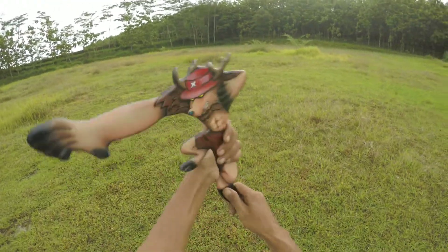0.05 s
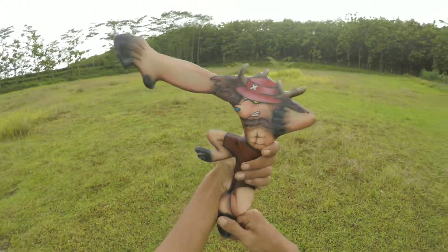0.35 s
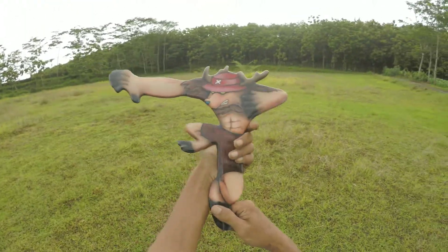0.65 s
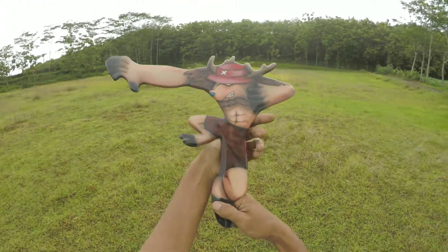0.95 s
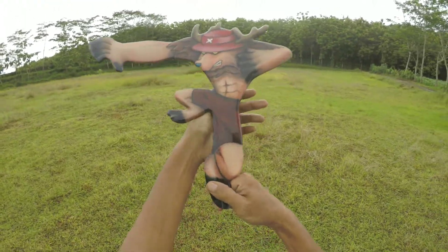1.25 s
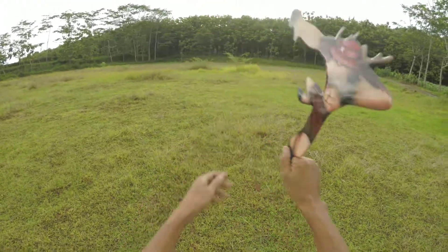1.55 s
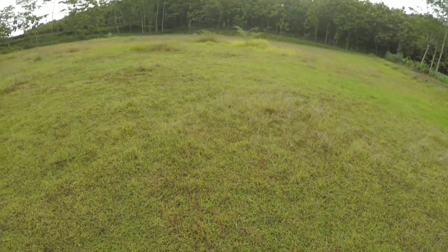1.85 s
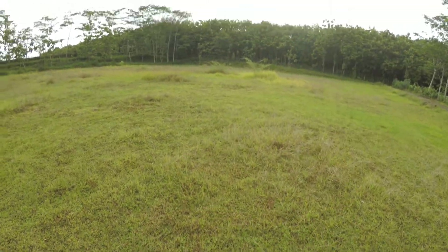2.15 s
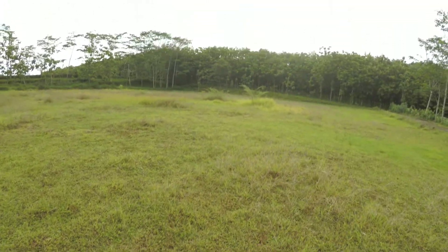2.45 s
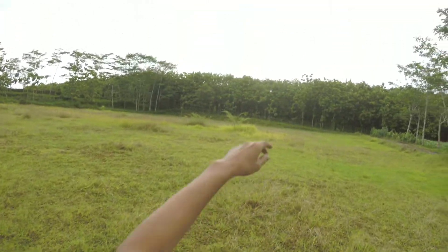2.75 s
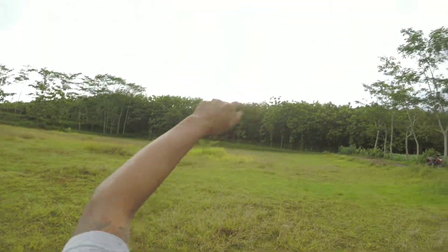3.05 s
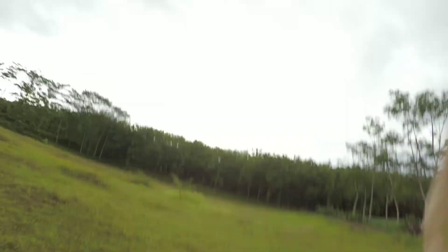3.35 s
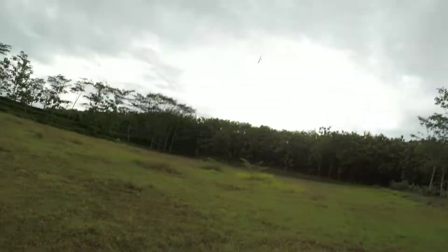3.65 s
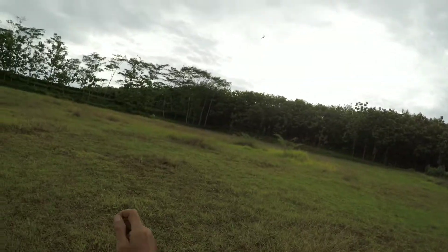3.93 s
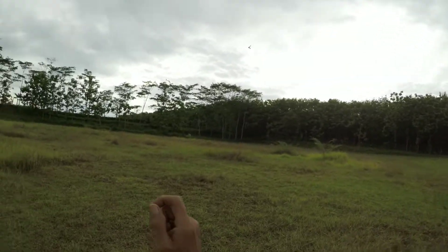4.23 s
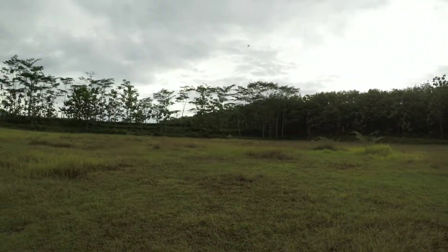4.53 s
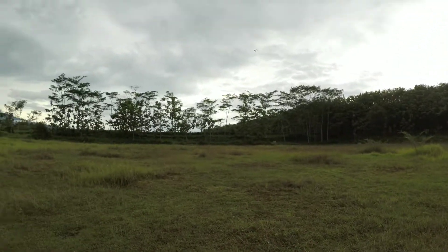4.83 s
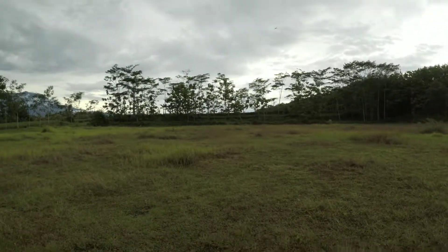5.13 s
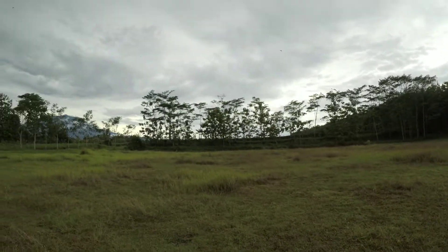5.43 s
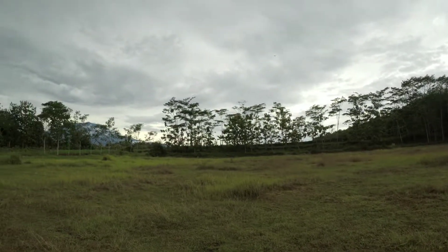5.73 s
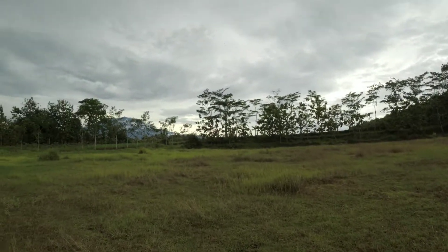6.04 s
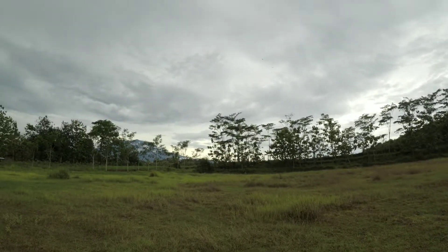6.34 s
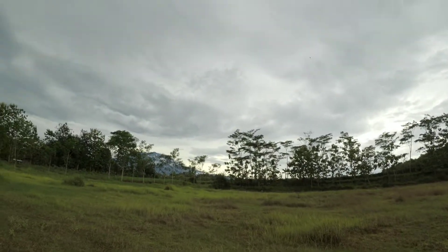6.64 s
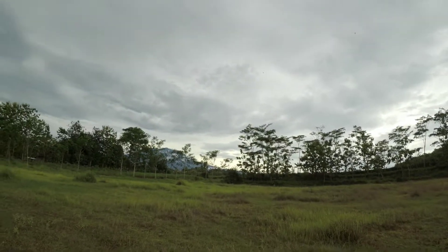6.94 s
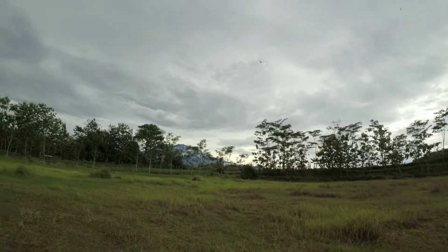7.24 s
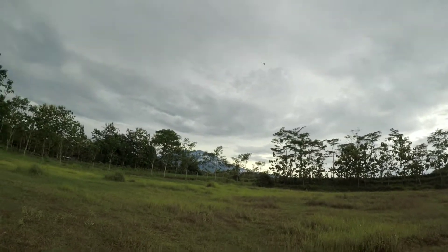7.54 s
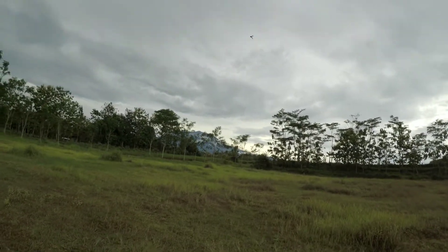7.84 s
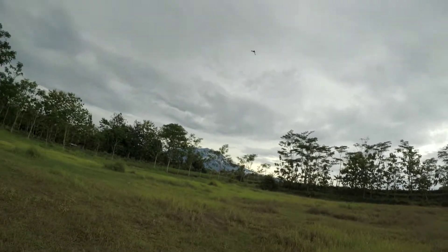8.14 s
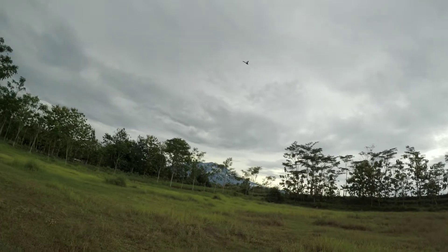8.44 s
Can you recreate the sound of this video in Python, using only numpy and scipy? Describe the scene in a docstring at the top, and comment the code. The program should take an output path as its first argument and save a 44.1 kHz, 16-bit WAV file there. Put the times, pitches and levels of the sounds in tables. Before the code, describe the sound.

A head-worn camera's mount clicks, rubs and creaks over light gusts on the microphone and thin cricket chirping in a meadow.

```python
"""Light wind rumbles over the hush of a meadow where bush-crickets sing by rubbing their wings.
The listener is a head-worn camera whose two microphone ports are buffeted by turbulent eddies.
As the head turns, the strap rubs and the plastic mount clicks, knocks and creaks in damped modes
that rock the two ports in opposite senses. The camera's limiter ducks after the hardest blows."""
import sys
import numpy as np
from scipy.fft import rfft, irfft, next_fast_len
from scipy.io import wavfile
from scipy.ndimage import uniform_filter1d, minimum_filter1d, map_coordinates

SR = 44100
rng = np.random.default_rng(int(sys.argv[2]) if len(sys.argv) > 2 else 0)


def wav_record(signal):
    """Record a signal, one row per channel, as 16-bit PCM in the file named by sys.argv[1]."""
    frames = np.transpose(np.atleast_2d(signal))
    bounded = np.clip(frames, -1, 1)
    # unit amplitude maps onto the largest positive 16-bit level
    quanta = np.round(bounded * 32767).astype(np.int16)
    wavfile.write(sys.argv[1], SR, quanta)


N = 382788

# coherence of airborne sound at the two ports: (frequency [Hz], correlation [-1 to 1])
AIR_COHERENCE = [(200, 0.094), (550, -0.45), (1100, -0.43), (2400, 0.061), (3900, 0.45), (6200, -0.3),
                 (10000, -0.25)]
# pressure of slow eddies on the ports: (frequency [Hz], spectral level [dB])
BUFFET_SPECTRUM = [(8, -7.5), (22, 2.5), (35, -2), (60, -7.5), (100, -28.5), (200, -37), (500, -94)]


def amp(db):
    """Decibels to amplitude ratio."""
    return np.exp(np.asarray(db) * np.log(10) / 20)


def unit(x):
    """Normalisation to rms 1."""
    return x / np.sqrt(np.mean(x ** 2) + 1e-20)


def clock():
    """The time of each sample [s]."""
    return np.arange(N) / SR


def curves(rows):
    """Linear interpolation in time: one value per sample for each column after the first."""
    times, *columns = np.transpose(rows)
    return [np.interp(clock(), times, column) for column in columns]


def along(points, hz):
    """Interpolation of (frequency [Hz], value) points on a log axis; a plain number holds everywhere."""
    freqs, values = np.transpose(points) if np.ndim(points) else ([1], [points])
    return np.interp(np.log(hz + 1), np.log(freqs), values)


def wobble(rate):
    """Random modulation: a smooth curve through `rate` Gaussian knots a second."""
    steps = np.arange(0, N * rate / SR + 1, 1 / 4)
    knots = rng.standard_normal(len(steps) // 4 + 3)
    return np.interp(clock() * rate, steps, map_coordinates(knots, [steps]))


def swells(rows):
    """Summed Gaussian envelopes from rows of (peak time [s], half length [s], level [dB])."""
    t = clock()[::32]
    bells = (amp(db) * np.exp(-np.minimum(((t - s) / half) ** 2, 20)) for s, half, db in rows)
    return np.interp(clock(), t, sum(bells))


def panned(right_db):
    """Left and right gains for a level difference between the ports."""
    return amp(np.array([[-.5], [.5]]) * right_db)


def add(track, s, sound):
    """Superposition of a short sound on the track at time s."""
    part = track[:, round(s * SR):][:, :sound.shape[-1]]
    part += sound[..., :part.shape[1]]


def filtered(x, response):
    """Linear filtering: the spectrum of x times a frequency response."""
    size = next_fast_len(N + SR // 2)
    return irfft(rfft(x, size) * response(np.fft.rfftfreq(size, 1 / SR)), size)[..., :N]


def noise(gain):
    """Two uncorrelated Gaussian noises coloured by a gain of frequency."""
    size = next_fast_len(N, real=True)
    bins = rng.standard_normal((2, 2 * (size // 2 + 1)), dtype=np.float32).view(np.complex64)
    return irfft(bins * gain(np.fft.rfftfreq(size, 1 / SR)).astype(np.float32), size)[:, :N]


def rush(spectrum, coherence):
    """Partly coherent stereo noise of rms 1; coherence runs from -1 (antiphase) to 1 (in phase)."""
    def mid_side_gains(hz):
        angle = np.arccos(np.clip(along(coherence, hz), -1, 1)) / 2
        return amp(along(spectrum, hz)) * [np.cos(angle), np.sin(angle)]
    mid, side = noise(mid_side_gains)
    return unit(np.array([mid + side, mid - side]))


def ring(modes, port_phase, attack_s, scatter_db, sign=1):
    """Damped modes (Hz, dB, T60 s), lagging port_phase [rad] on the right; sign -1 opposes neighbours."""
    t = np.arange(SR // 16) / SR
    lags = np.broadcast_to(port_phase, len(modes))
    sound = np.zeros((2, len(t)))
    for k, (hz, db, t60) in enumerate(modes):
        decay = amp(db + rng.normal(0, scatter_db) - 60 * t / t60)
        sound += sign ** k * decay * np.sin(2 * np.pi * hz * t - np.array([[0], [lags[k]]]))
    return sound * (1 - np.exp(-t / attack_s))


def breeze():
    """Turbulent pressure: slow eddies buffet the ports; smaller ones flutter and die in the lulls."""
    # wind between gusts: (time [s], relative buffet level [dB], relative flutter level [dB])
    strength = [(0, -37, -34.5), (0.55, -43, -39.5), (1.14, -52.5, -46.5), (2.1, -53.5, -50),
                (2.5, -40.5, -42.5), (3.1, -40, -35.5), (3.7, -35, -42), (4.2, -41, -41), (5.0, -36, -31),
                (5.5, -36, -35), (6.3, -36, -34), (7.1, -38.5, -33.5), (7.8, -30.5, -33.5), (8.4, -36, -39),
                (8.68, -28, -30)]
    # small eddies: (frequency [Hz], spectral level [dB])
    flutter_spectrum = [(35, -10), (70, 4.5), (120, -0.5), (180, -9.5), (280, -28.5), (600, -46.5),
                        (2000, -61)]
    buffet_db, flutter_db = curves(strength)
    buffet_gain = amp(buffet_db + 7 + 1.6 * wobble(11)) * panned(right_db=0.5)
    buffet = buffet_gain * rush(BUFFET_SPECTRUM, coherence=0.52)
    lull_gate = amp(flutter_db) / np.hypot(amp(flutter_db), amp(-41))
    flutter_gain = lull_gate * amp(flutter_db + 1.3 + 2.16 * wobble(20)) * panned(right_db=-3.5)
    return buffet + flutter_gain * rush(flutter_spectrum, coherence=0.86)


def far_trees():
    """Broadband noise: the hush of distant trees, slowly modulated in level."""
    # the hush: (frequency [Hz], spectral level [dB])
    spectrum = [(120, -13), (300, 3), (600, -1), (1100, -2), (1800, -9.5), (2600, -11), (4200, -17),
                (6200, -13.5), (8000, -12.5), (10500, -14), (11300, -26.5), (14500, -28.5), (15500, -49)]
    return amp(-49 + 0.73 * wobble(4.11)) * rush(spectrum, AIR_COHERENCE)


def distant_drone():
    """A low band of noise with faint tones that waver in amplitude and frequency."""
    # the noise band: (frequency [Hz], spectral level [dB])
    spectrum = [(40, -7), (95, -19.5), (135, 0.5), (185, -1.5), (230, -7), (270, -11), (340, -16),
                (600, -24.5), (1500, -54)]
    # its tones: (frequency [Hz], level [dB])
    tones = [(134, -47.5), (186, -51.5), (264, -55)]
    drone = amp(-43.5 + wobble(2.77)) * rush(spectrum, coherence=0.77)
    for hz, db in tones:
        gain = amp(db + 2.35 * wobble(5))
        drone += gain * np.sin(2 * np.pi * np.cumsum(hz + 1.6 * wobble(5)) / SR)
    return drone


def stridulation(pitch_hz, width_hz, stroke_hz, sharpness, scatter, fall_hz, port_phase):
    """Stridulation: each wing stroke is a tone pulse falling in pitch, partly scattered by the grass."""
    stroke = np.cumsum(stroke_hz) / SR % 1 - .5
    phase = 2 * np.pi * np.cumsum(pitch_hz - fall_hz * stroke + wobble(700) * width_hz / 2) / SR
    carrier = np.cos([phase, phase - port_phase])
    pulses = np.exp(sharpness * np.cos(2 * np.pi * stroke))
    scattered = unit(noise(lambda hz: 1 / (1 + (hz / width_hz) ** 3)))
    return unit(carrier * (pulses + scatter * scattered))


def steady_chirps(attack_s, swell_db, rest_db):
    """Periodic gating: each chirp grows, then sinks into a rest that the meadow's echo half fills."""
    onset_s, period_s, length_s, release_s = 4.510, .1055, .09, .008
    age = (clock() - onset_s) % period_s
    gate = np.clip(np.minimum(age / attack_s, (length_s - age) / release_s), amp(rest_db), 1)
    return unit(gate * amp(swell_db * age / length_s + 0.8 * wobble(15)))


def unsteady_chirps(rate_hz, pause_db):
    """Amplitude modulation: chirps parted by short dips, at a slightly drifting pace."""
    cycles = np.cumsum(rate_hz * (1 + 0.035 * wobble(3.03))) / SR
    return unit(amp(-pause_db * np.sin(np.pi * cycles) ** 8))


def crickets():
    """Two bush-crickets stridulate in chirps, in front of a distant chorus."""
    # the near and the higher cricket: (time [s], level [dB], right over left [dB], pitch [Hz])
    near_song = [(0, -75, 5, 9030), (2.1, -67, 12, 9030), (2.6, -60, 14, 8980), (3.3, -56.5, 18, 8910),
                 (3.55, -57.5, 14, 9050), (3.9, -55, 19, 9090), (4.7, -53.5, 16, 9080),
                 (5.2, -57, 17, 8990), (5.8, -58, 13, 8980), (6.6, -61, 16.5, 8980), (8.68, -67, 6, 9150)]
    high_song = [(0, -63, -5, 9940), (2.1, -60, -1, 9830), (2.6, -72, 8, 9650), (4.2, -61.5, 14, 9610),
                 (5.4, -59, 16, 9650), (6.3, -62, 14, 9730), (7.5, -57.5, 12, 9680),
                 (8.68, -60.5, 12, 9680)]
    # the chorus and a thin hiss: (frequency [Hz], spectral level [dB])
    chorus_spectrum = [(6800, -41), (7250, -6), (7500, -4), (7850, -15), (8300, -22), (8900, -4), (9400, 3),
                       (10000, -7.5), (10600, -8.5), (11100, -34)]
    hiss_spectrum = [(13000, -30), (14000, -3), (14600, 0), (15100, -25)]
    near_db, near_right_db, near_hz = curves(near_song)
    high_db, high_right_db, high_hz = curves(high_song)
    near = stridulation(near_hz, width_hz=165, stroke_hz=135 + 1.5 * wobble(7.2),
                        sharpness=0.77, scatter=0.38, fall_hz=810, port_phase=2.65)
    near *= amp(near_db) * panned(near_right_db) * steady_chirps(0.011, swell_db=3.5, rest_db=-10)
    high = stridulation(high_hz, width_hz=241, stroke_hz=130 + 5 * wobble(5),
                        sharpness=0.44, scatter=0.6, fall_hz=790, port_phase=2.3)
    high *= amp(high_db) * panned(high_right_db) * unsteady_chirps(rate_hz=8.1, pause_db=5)
    chorus = amp(-59 + 0.42 * wobble(14)) * panned(8.5) * rush(chorus_spectrum, coherence=-0.24)
    # a faint, thin hiss near 14.5 kHz follows the higher cricket's level
    hiss = amp(high_db - 16 + 1.5 * wobble(16)) * panned(4) * rush(hiss_spectrum, coherence=0.1)
    return near + high + chorus + hiss


def buzzing_insect():
    """Stridulation in bursts: each swells to a wavering hold while the wing strokes slow, then stops."""
    # a third insect: (start [s], end [s], level [dB], right over left [dB], port phase [rad])
    buzzes = [(0.05, 0.624, -53, -5.5, 2.4), (1.08, 1.62, -59, 0, -3), (1.63, 1.78, -54, -1, -2.2),
              (2.34, 2.92, -53.5, -3.5, -1.6), (3.68, 4.178, -50, -2, 3), (4.72, 5.29, -48.5, 8, 2.5),
              (5.795, 6.422, -53.5, 3.5, 2.9), (6.9, 7.52, -57, 3, -2.8), (8.1, 8.632, -54.5, 1, -1.6)]
    level, stroke_hz, phase = np.zeros((2, N)), np.full((1, N), 190.), np.zeros((1, N))
    for start, end, db, right_db, port_phase in buzzes:
        progress = np.linspace(0, 1, round((end - start) * SR))
        envelope = np.tanh(2.4 * progress) * np.minimum((1 - progress) / 0.065, 1)
        add(level, start, amp(db) * panned(right_db) * envelope)
        add(stroke_hz, start, -28 * progress ** 2)
        add(phase, start, np.full(len(progress), port_phase))
    level *= amp(0.9 * wobble(14))
    return level * stridulation(7650, width_hz=170, stroke_hz=stroke_hz[0],
                                sharpness=0.75, scatter=0.43, fall_hz=400, port_phase=phase[0])


def strap_rubbing():
    """Sliding friction: the strap chafes restlessly on the mount, steadier in its firm strokes."""
    # light contact, firmer once the head starts to turn: (time [s], relative level [dB])
    contact = [(0, -56), (2.1, -58.5), (2.8, -48.5), (3.9, -52), (4.6, -47), (8.1, -47), (8.35, -60)]
    # firm strokes: (peak time [s], half length [s], relative level [dB])
    strokes = [(2.58, 0.054, -42), (2.9, 0.059, -41.5), (3.0, 0.022, -41), (3.08, 0.022, -38),
               (3.19, 0.028, -35.5), (3.28, 0.06, -34), (3.38, 0.022, -33), (3.407, 0.014, -20.5),
               (3.472, 0.026, -28), (3.51, 0.051, -33), (3.668, 0.02, -33), (3.75, 0.04, -42.5),
               (4.35, 0.17, -47), (5.07, .02, -37), (5.17, 0.028, -36), (5.32, .05, -37.5),
               (5.94, 0.094, -39.5), (6.21, 0.052, -38.5), (6.43, .02, -37.5), (6.67, 0.072, -36),
               (7.35, 0.14, -37.5), (7.665, 0.033, -35.5), (7.85, 0.14, -40.5), (8.12, 0.02, -32.5),
               (8.24, 0.035, -39.5), (8.66, 0.017, -26)]
    # the strap and the rubbed shell: (frequency [Hz], spectral level [dB])
    strap_spectrum = [(50, -21), (120, -5), (250, 0.5), (400, -2), (560, -9.5), (720, -17), (850, -12),
                      (1050, -15.5), (1400, -19), (1900, -29), (2700, -32), (4000, -70)]
    shell_spectrum = [(200, 3.5), (350, 0.5), (550, 0.5), (750, -29), (1100, -8), (1470, -5.5),
                      (1700, -10.5), (1950, -13), (2300, -14.5), (2700, -17.5), (3500, -20.5), (8000, -40),
                      (12000, -65)]
    contact_db, = curves(contact)
    chafe = amp(contact_db + 3.9 * wobble(13) + 3.2 * wobble(70))
    drag = np.hypot(chafe, swells(strokes) * amp(1 + 2.1 * wobble(140)))
    strap = amp(3) * rush(strap_spectrum, coherence=-0.95)
    shell = amp(-9.5) * rush(shell_spectrum, coherence=0.66)
    return drag * (strap + shell)


def bird():
    """Frequency modulation: a far bird's thin peeps glide, blurred by a fast waver in pitch."""
    # calls: (start [s], length [s], first pitch [Hz], last pitch [Hz], relative level [dB])
    peeps = [(1.013, .09, 5180, 5250, -64), (1.042, .03, 5100, 3900, -65), (1.087, .025, 5240, 4000, -63)]
    track = np.zeros((2, N))
    waver_hz = 90 * wobble(533)
    for s, length, first_hz, last_hz, db in peeps:
        hz = np.linspace(first_hz, last_hz, round(length * SR))
        phase = 2 * np.pi * np.cumsum(hz + waver_hz[:len(hz)]) / SR
        add(track, s, amp(db + 3) * np.hanning(len(hz)) * np.sin(phase))
    return track


def brushing():
    """Friction noise: clothes and grass brush in grainy swells that arrive through the air."""
    # brushes: (peak time [s], half length [s], relative level [dB])
    strokes = [(1.8, 0.17, -56), (2.56, 0.12, -52), (2.77, .05, -59), (2.9, 0.064, -56), (3.07, 0.028, -58),
               (3.232, 0.068, -47.5), (3.336, 0.008, -49), (3.395, 0.042, -44), (3.53, 0.079, -49),
               (3.73, 0.026, -56), (4.377, 0.13, -58), (5.04, 0.04, -49), (5.132, 0.022, -50),
               (5.803, 0.051, -50.5), (6.577, 0.043, -47), (7.29, 0.038, -47), (7.995, .012, -47),
               (8.523, 0.026, -44.5), (8.63, 0.034, -43.5)]
    # rubbed cloth: (frequency [Hz], spectral level [dB])
    spectrum = [(300, -1), (1400, 6.5), (2600, 3.5), (3600, 0.5), (5000, -2.5), (7000, 3.5), (9000, 1.5),
                (12000, -31), (15000, -40)]
    grain = amp(0.5 + 2.95 * wobble(150) + 2.2 * wobble(900))
    return swells(strokes) * grain * rush(spectrum, AIR_COHERENCE)


def thump(port_phase):
    """Free vibration: the whole camera shudders in its low modes after a blow."""
    # the camera's modes: (frequency [Hz], level [dB], T60 [s])
    modes = [(115, -1, 0.028), (181, 0.5, 0.026), (273, -3.5, 0.023), (390, -6, 0.017)]
    return ring(modes, port_phase, attack_s=0.0024, scatter_db=2.5)


def clicks():
    """Impulse response: a sharp blow rings two opposed modes, with a tick, a dull push and a thump."""
    # clicks of the mount: (time [s], level [dB], ring [Hz], T60 [s], second ring [Hz], its level [dB],
    # tick [dB], push [dB], push [Hz], thump [dB], port phase [rad]); parts are relative to the level
    blows = [(1.897, -27.5, 1930, 0.0069, 2600, -10, -18, -6, 550, -1, -1.8),
             (2.1694, 8, 2430, 0.0082, 1300, -20, -11.5, -18, 700, -12, -2),
             (5.7463, -8, 1950, 0.0074, 3300, -6.5, -13, -5, 330, -7.5, -1.34),
             (6.129, -5.5, 1460, 0.0072, 1860, -1.5, -22, 4, 557, -7, -2.0)]
    # the tick's treble modes: (frequency [Hz], level [dB], T60 [s])
    tick_modes = [(2630, 10, 0.0061), (3220, 7.5, 0.0029), (5840, 2, 0.0042), (7280, 5.5, 0.0049),
                  (8500, -0.5, 0.0048), (10600, -14, 0.005)]
    push_t60_s = 0.0038
    track = np.zeros((2, N))
    for s, db, hz, t60, second_hz, second_db, tick_db, push_db, push_hz, thump_db, phase in blows:
        modes = [(hz, 0, t60), (second_hz, second_db, t60)]
        body = ring(modes, phase, attack_s=0.00037, scatter_db=1, sign=-1)
        tick = amp(tick_db) * ring(tick_modes, phase, attack_s=0.00011, scatter_db=0.5)
        push = amp(push_db) * ring([(push_hz, 0, push_t60_s)], phase, attack_s=0.0003, scatter_db=0.5)
        add(track, s, amp(db) * (body + tick - push + amp(thump_db) * thump(phase)))
    return track


def knocks():
    """Impact and recoil: a dull blow rings the case, then the camera shudders, rocks and settles."""
    # knocks of the mount:
    # (time [s], relative ring level [dB], thump [dB], rocking [dB], rocking [Hz], port phase [rad])
    blows = [(2.573, -21, -38, -34, 300, -1.6), (3.271, -36, -14, -20, 280, -1.2),
             (3.281, -33, -13.5, -22, 300, -1.3), (3.293, -31, -17, -15, 310, -1.5),
             (3.363, -19.5, -15, -11, 320, -1.5), (3.393, -14, -14, -11, 350, -2.5),
             (3.4165, -12, -3, 2, 357, -2), (3.535, -29, -17, -16, 300, 0),
             (3.672, -11, -13, -12, 290, -2.5), (4.063, -11.5, -22, -21, 400, -2.5),
             (6.729, -16.5, -17, -16, 302, -2), (7.6478, -6, -11, -2, 278, -2.5),
             (7.681, -33, -18, -16, 290, -2.4), (8.1153, -3.5, -7, -1, 280, -2.5),
             (8.214, -22, -14, -17, 280, 2.5), (8.24, -32, -14, -15, 280, 3),
             (8.657, -4, -8.5, -2.5, 280, -2.6)]
    # modes of the case and its catch: (frequency [Hz], level [dB], T60 [s])
    case_modes = [(485, -9.5, 0.034), (870, -7, 0.0068), (1364, -2, 0.018), (1474, -4.5, 0.019),
                  (1890, -7.5, 0.014), (2630, -17, 0.01)]
    recoil_s, rock_t60_s = 0.00218, 0.019
    track = np.zeros((2, N))
    for s, db, thump_db, rock_db, rock_hz, phase in blows:
        rock = ring([(rock_hz, 0, rock_t60_s)], port_phase=-2.46, attack_s=0.0013, scatter_db=1)
        add(track, s, amp(db - 4) * ring(case_modes, phase, attack_s=0.0016, scatter_db=1.5))
        add(track, s + recoil_s, amp(thump_db) * thump(phase) + amp(rock_db) * rock)
    return track


def gusts():
    """Vortex shedding: each gust buffets the ports separately and sheds quicker eddies off the camera."""
    # gusts from the wind or a swing of the head:
    # (peak time [s], half length [s], relative buffet level [dB], relative eddy level [dB])
    puffs = [(3.229, 0.067, -20, -26.5), (3.424, 0.08, -17.5, -27.5), (3.551, 0.013, -13, -19),
             (3.773, 0.093, -31, -42.5), (4.388, 0.094, -27, -37), (4.75, 0.047, -31.5, -35),
             (5.067, 0.057, -23.5, -22.5), (5.186, 0.07, -27.5, -23), (5.424, 0.053, -30, -34),
             (5.872, 0.1, -23.5, -37), (6.24, 0.045, -33, -32.5), (6.652, 0.099, -20.5, -34),
             (6.883, 0.038, -31, -29), (7.305, 0.04, -22, -38), (7.455, 0.03, -26, -40),
             (7.64, 0.05, -21, -25.5), (8.03, 0.078, -19.5, -32.5), (8.245, 0.017, -17.5, -27.5),
             (8.679, 0.057, -14, -28)]
    # shed eddies: (frequency [Hz], spectral level [dB])
    eddy_spectrum = [(35, -9), (70, 1), (110, -2.5), (165, -10.5), (250, -28), (600, -44), (2000, -82)]
    buffet_gain = swells([(s, half, db) for s, half, db, _ in puffs]) * amp(5 + 1.6 * wobble(10))
    eddy_gain = swells([(s, half, db) for s, half, _, db in puffs]) * amp(1 + 3.5 * wobble(20))
    buffet = buffet_gain * panned(right_db=4) * rush(BUFFET_SPECTRUM, coherence=0.078)
    return buffet + eddy_gain * rush(eddy_spectrum, coherence=0.24)


def scraping():
    """Forced resonance: the strap's edge slides with even pressure and keeps the shell ringing."""
    # scrapes, often just before a knock: (start [s], end [s], level [dB])
    scrapes = [(3.386, 3.428, -26.5), (3.443, 3.545, -34.5), (3.533, 3.576, -49), (3.643, 3.673, -41),
               (7.633, 7.652, -38), (8.098, 8.13, -36), (8.636, 8.673, -42)]
    # the shell's resonances: (frequency [Hz], bandwidth [Hz], level [dB])
    resonances = [(504, 89, -1.5), (1450, 130, -0.5), (1610, 94, -4), (1867, 130, -10), (2610, 150, -14)]
    ramp_s, port_phase = 0.018, -2.21
    pressure = np.zeros((1, N))
    for start, end, db in scrapes:
        t = np.arange(0, end - start, 1 / SR)
        add(pressure, start, amp(db) * np.minimum(np.minimum(t, end - start - t) / ramp_s, 1))
    shell = lambda f: sum(amp(db) / (1 + (2 * (f - hz) / width) ** 2) for hz, width, db in resonances)
    left = unit(noise(shell)[0])
    right = filtered(left, lambda hz: np.exp(-1j * port_phase))
    return pressure * np.array([left, right])


def creaks():
    """Stick-slip friction: each slip rings the mount's hinge, crushes grit and shoves the camera."""
    # slips: (time [s], level [dB], shove [dB], shove [Hz], hinge pitch [ratio], tilt [dB/octave])
    slips = [(3.406, -24, -23, 200, .9, -2), (3.412, -21, -14, 199, .85, 2),
             (3.4159, -19, -16, 199, 0.7, 0), (3.538, -35, -4, 75, 1, -1), (7.542, -17, -14, 198, 1.04, -2),
             (7.859, -17, -19, 172, 0.98, 1), (7.874, -23, -23, 170, 1.04, 0), (7.886, -26, -35, 170, 1, 1),
             (7.892, -22, -24, 170, 1, 0), (7.9225, -17, -31, 170, 1.1, 0),
             (7.925, -11.5, -15, 140, 0.96, 1.5), (7.9344, -7, -3, 116, 1.08, 0.5),
             (7.958, -6, -21, 170, 1, -1.5), (7.9631, -5, -27, 170, 1.02, 0.5),
             (7.966, -9, -15, 170, 0.93, 0), (7.9692, -1.5, 2, 127, 1, -0.5),
             (8.0098, -3.5, -7.5, 172, 0.94, -3)]
    # the hinge's modes: (frequency [Hz], level [dB], T60 [s], port phase [rad])
    hinge = [(720, -6.5, 0.007, 2.58), (1000, 0.5, 0.01, 3.21), (1410, -7, 0.006, 3.25),
             (1900, -12.5, 0.0058, 3.9), (2460, -7, 0.0093, 3.63), (3470, -10.5, 0.0075, 5.4)]
    # the clamp that holds the hinge: (frequency [Hz], level [dB], T60 [s])
    clamp = [(297, -6.5, 0.012)]
    # crushed grit: (frequency [Hz], spectral level [dB])
    grit_spectrum = [(800, -17), (1600, 1.5), (3800, 1), (4800, -6), (7500, -4.5), (10000, -14),
                     (14000, -29)]
    grit_db, grit_t60_s = -17.5, 0.0071
    shove_lag_s, shove_t60_s = 0.00081, 0.027
    grit = rush(grit_spectrum, coherence=-0.12)
    fade = amp(-60 * clock()[:SR // 20] / grit_t60_s)
    track = np.zeros((2, N))
    for s, db, shove_db, shove_hz, pitch, tilt_db in slips:
        # every slip grips at its own tension and shoves both ports the same way
        modes = [(hz * pitch, level + tilt_db * np.log2(hz / 2000), t60) for hz, level, t60, _ in hinge]
        creak = ring(modes, np.array(hinge)[:, -1], attack_s=0.00025, scatter_db=1.2, sign=-1)
        shove_modes = [(shove_hz, 0, shove_t60_s)] + clamp
        shove = ring(shove_modes, port_phase=0.55, attack_s=0.00082, scatter_db=1.3)
        crunch = grit[:, round(s * SR):][:, :len(fade)] * fade * amp(grit_db + 2 * tilt_db)
        add(track, s, amp(db) * creak)
        add(track, s, amp(db) * crunch)
        add(track, s + shove_lag_s, amp(shove_db) * shove)
    return track


def scene():
    """Superposition at the two ports of the meadow, the wind and the vibration of the mount."""
    # the meadow's sound sinks briefly, then recovers: (time [s], level [dB])
    meadow_level = [(0, 0.5), (3.4, -0.5), (3.75, -7.5), (3.95, -6.5), (4.35, -0.5), (8.68, 1)]
    meadow_db, = curves(meadow_level)
    meadow = amp(meadow_db) * (far_trees() + distant_drone() + crickets() + buzzing_insect() + bird())
    wind = breeze() + gusts()
    friction = strap_rubbing() + brushing() + scraping()
    return meadow + wind + friction + clicks() + knocks() + creaks()


def limiter(x, ceiling_db, release_db_per_s):
    """Peak limiting: the gain drops at once on a peak over the ceiling and creeps back."""
    over_db = np.maximum(20 * np.log10(np.abs(x).max(0) + 1e-9) - ceiling_db, 0)
    ramp = release_db_per_s * clock()
    gain = amp(ramp - np.maximum.accumulate(over_db + ramp))
    return x * uniform_filter1d(minimum_filter1d(gain, size=24), size=24)


def record(dry):
    """The camera limits peaks, clips any overshoot and passes nothing above its band limit."""
    band_limit_hz = 15100
    held = limiter(dry, ceiling_db=0, release_db_per_s=99)
    return filtered(np.clip(held, -1, 1), lambda hz: hz < band_limit_hz)


dry = scene()
out = record(dry)
wav_record(out)
```